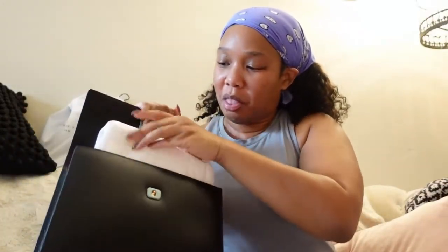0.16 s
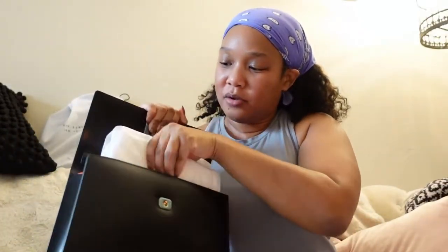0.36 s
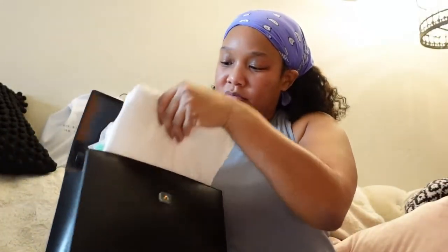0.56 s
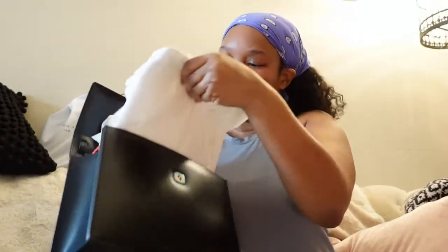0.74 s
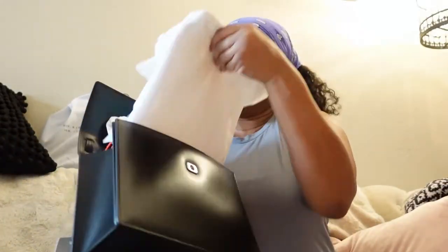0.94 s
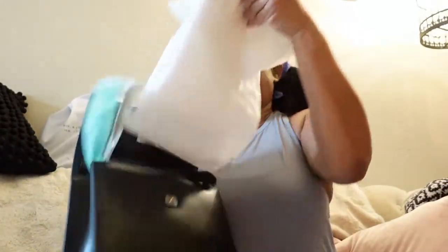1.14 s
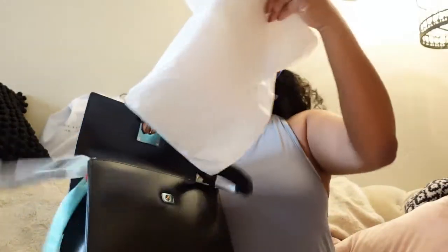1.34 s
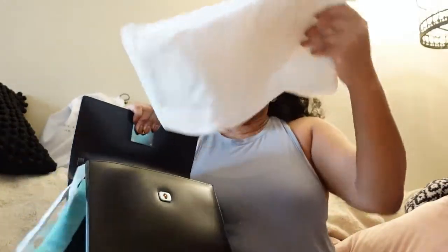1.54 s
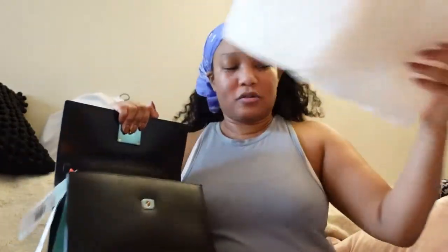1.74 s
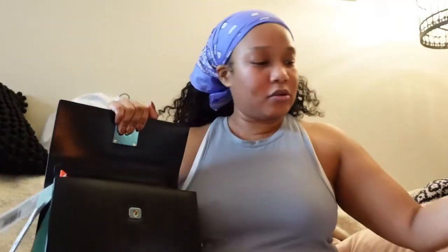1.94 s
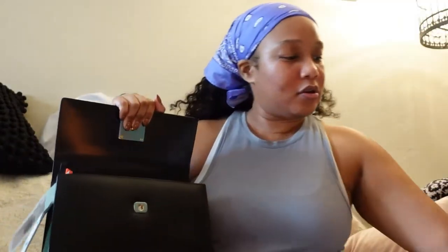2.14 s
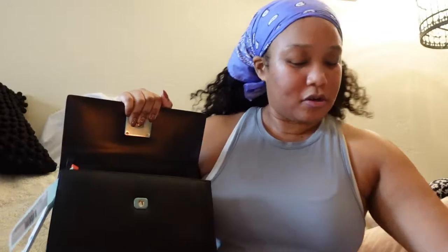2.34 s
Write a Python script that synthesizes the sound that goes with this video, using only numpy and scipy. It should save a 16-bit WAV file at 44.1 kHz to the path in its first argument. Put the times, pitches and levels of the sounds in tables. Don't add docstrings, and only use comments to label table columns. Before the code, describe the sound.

Crisp paper crackling, pulled from a stiff leather bag with dull knocks, then set down softly

```python
import sys
import numpy as np
from scipy import signal
from scipy.fft import rfft, irfft
from scipy.io import wavfile
from scipy.ndimage import uniform_filter1d

SR = 44100
rng = np.random.default_rng(int(sys.argv[2]) if len(sys.argv) > 2 else 0)


def generate_wav(signal):
    frames = np.transpose(np.atleast_2d(signal))
    scaled = np.clip(frames, -1, 1) * 32767
    pcm = np.round(scaled).astype(np.int16)
    wavfile.write(sys.argv[1], SR, pcm)


def makeup_ratio(level_db):
    decades = np.asarray(level_db, float) / 20
    return 10 ** decades


N = 105840


def level(x):
    return x / np.sqrt(np.mean(x ** 2))


def shape(x, hz, db):
    f = np.maximum(np.arange(N // 2 + 1) * SR / N, 1)
    return irfft(rfft(x) * makeup_ratio(np.interp(np.log(f), np.log(hz), db)), N)


def band(x, hz, width_hz):
    return signal.lfilter(*signal.iirpeak(min(hz, .45 * SR), hz / width_hz, fs=SR), x)


def walk(rate_hz):
    hold = int(SR / rate_hz)
    steps = np.repeat(rng.standard_normal(N // hold + 1), hold)
    return level(uniform_filter1d(steps, hold)[:N])


def fall(t, t60_s):
    return (t >= 0) * np.exp(-np.log(1000) * np.maximum(t, 0) / t60_s)


def pan(db):
    return makeup_ratio(np.array([db / 2, -db / 2]))


def air():
    noise = rng.standard_normal((2, N))
    return makeup_ratio(-70) * level(shape(noise, [30, 300, 3000, 16000], [-10, 7, -11, -70]))


def room(x, t):
    t60_s, gain_db, soft_hz = 0.39, -11.5, 7240
    lag = t[:SR // 2]
    tail = rng.standard_normal((2, len(lag))) * fall(lag - .004, t60_s)
    tail /= np.sqrt(np.sum(tail ** 2, axis=1, keepdims=True))
    same, apart = signal.fftconvolve(x.mean(axis=0)[None], tail, axes=1)[:, :N]
    apart = shape(apart, [300, 3000, soft_hz, 14000], [-14.0, -6.5, -2, 2.0])
    sides = same + apart * np.array([[1], [-1]])
    return makeup_ratio(gain_db) * shape(sides, [100, soft_hz, 16000], [0, 0, -6])


# start_s, effort_db, bag_contact_db, crispness_db
GRIP = [(0.0, -31.5, -7, -2), (0.066, -35.5, -11, 0.5), (0.125, -38.5, -16, -3), (0.14, -43.5, -13, 0),
        (0.172, -48.5, -4.5, 3.5), (0.2, -36, -20, -7), (0.247, -36.5, -15.5, 3), (0.286, -44.5, -19, 1),
        (0.34, -35, -16, -1.5), (0.385, -38.5, -10.5, -1.5), (0.415, -41.5, -7.5, -2),
        (0.445, -37.5, -13.5, -3.5)]
# start_s, effort_db, bag_contact_db, crispness_db
TUGS = [
    (.43, -37, -6, 0),
    (0.519, -31, -13.5, -1.5),
    (.56, -25.5, -10, -0.5),
    (.62, -25.5, -11, -1),
    (.69, -30.5, -9, -1),
    (.73, -26.5, -13, 1),
    (.77, -24.5, -12, 0.5),
    (.82, -33.5, -11.5, 2),
    (0.877, -34, -8, 0),
]
# start_s, effort_db, bag_contact_db, crispness_db
YANK = [(0.954, -25.5, -12.5, 2.5), (.99, -26.5, -10.5, 1), (1.07, -26.5, -15.5, -1),
        (1.122, -25, -9, -0.5), (1.145, -22.5, -15, 3.5), (1.167, -21, -11, -2), (1.197, -29.5, -20, 2),
        (1.27, -35.5, -5, 1), (1.299, -35, -8, 3.5), (1.33, -38.5, -4.5, 2.5), (1.42, -41, -3, 3.5)]


def pull():
    return np.array(GRIP + TUGS[1:] + YANK).T


def settle(t):
    gain_db, wall_hz, t60_s, hold_s = -39.5, 211.3, 0.068, .05
    decay = np.where(t < hold_s, 1, fall(t - hold_s, t60_s / 2))
    return makeup_ratio(gain_db) * np.sin(2 * np.pi * wall_hz * t) * decay * np.clip(t / 0.033, 0, 1)


# mode_hz, level_db, t60_s
BAG_MODES = [(223, -11.5, 0.091), (279.4, -6, 0.092), (317, -1, 0.096), (374.7, 0, 0.1), (430.3, -5, 0.12)]


def rubbing(t):
    rub_db, thud_db = -0.1, -33.5
    start_s, effort_db, contact_db, _ = pull()
    rub = rng.standard_normal(N) * makeup_ratio(2.2 * walk(45))
    body = np.zeros(N)
    for hz, db, t60_s in BAG_MODES:
        body += makeup_ratio(db) * level(band(band(rub, hz, 3.5 / t60_s), hz, 5.5 / t60_s))
    thud = level(shape(rub, [25, 90, 160, 220], [-12, -7.5, 3.0, -20.0]))
    press_db = np.interp(t, start_s, effort_db + contact_db) + rub_db
    leave = np.clip((1.72 - t) / 0.5, 0, 1)
    return (level(body) + makeup_ratio(thud_db / 2) * thud) * makeup_ratio(press_db) * leave


# start_s, peak_db, ring_hz, brightness_db
KNOCKS = [(1.205, -27.5, 399, -34), (1.229, -29, 425, -3.5), (1.252, -35, 405, -12), (1.288, -32, 350, -27),
          (1.347, -30.5, 402, -10), (1.408, -31, 393, -24), (1.421, -29, 380, -24), (1.442, -41, 432, -26),
          (1.486, -29, 430, -2), (1.506, -30.5, 424, -17), (1.529, -36.5, 412, -23),
          (1.558, -36.5, 410, -20), (1.686, -32, 395, -13), (1.705, -38, 361, -24), (1.729, -49, 393, -14),
          (1.756, -50, 416, -19)]


def knocks(t):
    gain_db, ring_t60_s, tick_t60_s, tick_hz = 0.45, 0.069, 0.026, 1060
    out = np.zeros(N)
    for start_s, db, hz, bright_db in KNOCKS:
        since = t - start_s
        swell = 1 - fall(since, 0.015)
        ring = np.sin(2 * np.pi * hz * since) + .5 * np.sin(2 * np.pi * 1.09 * hz * since)
        ring = ring * fall(since, ring_t60_s)
        tick = level(band(band(rng.standard_normal(N), tick_hz, 600.0), tick_hz, 1300.0))
        tick = tick * fall(since, tick_t60_s)
        out += makeup_ratio(db + gain_db) * swell * (ring + makeup_ratio(bright_db + 11.0) * tick)
    return out


def bag(t):
    return rubbing(t) + settle(t) + knocks(t)


# start_s, peak_db, pitch_hz, t60_s
PINGS = [
    (1.432, -27, 1900, .035),
    (1.447, -36, 2700, .02),
    (1.454, -36, 3300, .02),
    (1.6665, -36, 1400, .01),
    (1.754, -34, 3400, .01),
    (2.0465, -36, 4160, .015),
    (2.1415, -38, 3010, .02),
]


def pings(t):
    out = np.zeros(N)
    for start_s, db, hz, t60_s in PINGS:
        since = t - start_s
        envelope = (1 - fall(since, 0.0013)) * fall(since, t60_s)
        out += makeup_ratio(db) * np.sin(2 * np.pi * hz * since) * envelope
    return out


# start_s, mids_db, lows_db, highs_db (lows and highs relative to mids)
CRACKS = [(0.042, -37, 2, -11), (0.1063, -37, -5, -10), (0.1291, -43, 2, -10), (0.2413, -40, -5, 1),
          (0.3529, -46, 5, 3), (0.4532, -38, -8, -2), (0.5459, -33, 4, -1), (0.656, -36, 3, 2),
          (0.7071, -34, -4, -3), (0.7197, -34, 5, -3), (0.7266, -32, -9, 3), (0.7378, -31, -1, -6),
          (0.7619, -30, -11, -5), (0.8312, -37, 0, -11), (0.8367, -36, -2, 0), (0.9731, -36, 1, 8),
          (0.9945, -28, -3, -3), (1.0437, -30, -5, -6), (1.0927, -33, 1, -6), (1.1034, -27, 0, -6),
          (1.1463, -29, 1, 3), (1.1626, -27, -5, -8), (1.1714, -33, 6, 0), (1.2937, -37, -4, -13),
          (1.3014, -44, 7, 7), (1.3473, -37, -4, -1)]
# start_s, mids_db, lows_db, highs_db, length_s
SNAPS = [(1.4323, -37.0, -2.0, 0.0, 0.016), (1.4362, -35.0, 4.0, -2.0, 0.008),
         (1.4452, -44.0, 4.0, 1.0, 0.014), (1.4757, -43.0, -5.0, -11.0, 0.008),
         (1.4994, -44.0, -3.0, -5.0, 0.006), (1.5208, -42.0, 0.0, -8.0, 0.007),
         (1.5274, -38.0, -3.0, -5.0, 0.007), (1.5474, -46.0, -2.0, -7.0, 0.004),
         (1.5577, -41.0, -7.0, -9.0, 0.009), (1.5628, -43.0, -5.0, -2.0, 0.008),
         (1.5929, -46.0, 1.0, -3.0, 0.009), (1.6227, -46.0, -6.0, -3.0, 0.009),
         (1.6348, -43.0, -3.0, 2.0, 0.006), (1.6484, -45.0, -11.0, -3.0, 0.005),
         (1.6673, -34.0, -1.0, -1.0, 0.009), (1.6714, -38.0, -10.0, 0.0, 0.009),
         (1.676, -43.0, 0.0, 4.0, 0.009), (1.7022, -47.0, -9.0, 2.0, 0.005),
         (1.7129, -44.0, -3.0, 4.0, 0.009), (1.7257, -38.0, -10.0, -9.0, 0.009),
         (1.7448, -41.0, -7.0, 3.0, 0.007), (1.7546, -33.0, -5.0, -3.0, 0.005),
         (1.7632, -45.0, 1.0, 1.0, 0.005), (1.7877, -46.0, 2.0, 0.0, 0.009),
         (1.8411, -45.0, -5.0, -2.0, 0.005), (1.8478, -40.0, -15.0, -2.0, 0.009),
         (1.8518, -50.0, -10.0, 7.0, 0.009), (1.8788, -43.0, -4.0, -4.0, 0.007),
         (1.9023, -33.0, -8.0, -7.0, 0.007), (1.9543, -37.0, -10.0, -4.0, 0.006),
         (1.9944, -47.0, -15.0, 2.0, 0.005), (2.0472, -37.0, -15.0, -9.0, 0.006),
         (2.0576, -45.0, -2.0, -4.0, 0.008), (2.0832, -38.0, -14.0, -2.0, 0.005),
         (2.0915, -48.0, -9.0, 1.0, 0.009), (2.1028, -55.0, 0.0, 8.0, 0.005),
         (2.1433, -47.0, 0.0, -7.0, 0.008), (2.1744, -49.0, 1.0, -6.0, 0.009),
         (2.1828, -49.0, -8.0, -5.0, 0.006), (2.2985, -52, -1, -5, 0.009)]


def cracks(t):
    bag_length_s, rise_t60_s, tail_t60_s, tail_db, gain_db = .005, .0005, 0.05, -24, 1.5
    out, lag = np.zeros(N + SR), t[:SR // 8]
    mids_lows_highs_hz = (3500, 8000), (1300, 3500), (8000, 12200)
    filters = [signal.butter(2, hz, "band", fs=SR, output="sos") for hz in mids_lows_highs_hz]
    folds = [(*row, bag_length_s) for row in CRACKS] + list(SNAPS)
    for start_s, db, lows_db, highs_db, length_s in folds:
        decay = fall(lag, length_s) + makeup_ratio(tail_db) * fall(lag, tail_t60_s)
        burst = rng.standard_normal(len(lag)) * (1 - fall(lag, rise_t60_s)) * decay
        for sos, colour_db in zip(filters, (0, lows_db, highs_db)):
            part = signal.sosfilt(sos, burst)
            part /= part[:SR // 250].std()
            out[int(start_s * SR):][:len(lag)] += part * makeup_ratio(db + colour_db + gain_db)
    return out[:N]


def ticks(t):
    ticks_per_s, scatter_db, top_db, t60_s = 300, 3, 9, 0.002
    chance = rng.random((2, N))
    size_db = np.minimum(-scatter_db * np.log(chance[1] + 1e-9), top_db)
    hits = (chance[0] < ticks_per_s / SR) * makeup_ratio(size_db)
    clicks = signal.fftconvolve(hits, fall(t[:SR // 100], t60_s))[:N] * rng.standard_normal(N)
    return level(shape(clicks, [600, 2500, 9000, 16000], [-17, 1.5, 7, -36.0]))


# band_hz, density_db (per Hz)
PAPER = [(290, -8), (500, -14), (847, 1), (1000, -9.5), (1500, 4.5), (1800, -6), (3000, -1), (9120, -7.5),
         (15000, -12)]


def crinkle(t, free):
    grains_per_s, scatter_db, top_db, grain_cycles = 6000, 8, 10, 2.2
    spread_db, wide_hz, tick_db = 2, 12000, -8
    bag_clump_db, loose_clump_db = .9, 1.6
    paper_hz, paper_db = np.array(PAPER).T
    out = np.zeros((2, N))
    clump_db = bag_clump_db + (loose_clump_db - bag_clump_db) * free
    clump_db = clump_db * (walk(300) + .5 * walk(100)).clip(-3, 2)
    hiss_gain = makeup_ratio(-1 - 6 * free)
    for hz in 420 * 2 ** np.arange(0, 5.5, .33):
        chance = rng.random((3, N))
        size_db = np.minimum(-scatter_db * np.log(chance[1] + 1e-9), top_db)
        hits = chance[0] < grains_per_s / 5 / SR * min(hz / 3000, 1)
        snaps = hits * makeup_ratio(size_db) * np.sign(chance[2] - .5)
        snaps = snaps * pan(spread_db * min(hz / wide_hz, 1) * rng.standard_normal(N))
        width_hz = hz / grain_cycles
        grains = level(band(band(snaps, hz, width_hz), hz, width_hz))
        hiss = level(band(band(rng.standard_normal(N), hz, width_hz), hz, width_hz))
        mix = (grains + hiss_gain * hiss) / np.sqrt(1 + hiss_gain ** 2)
        band_db = np.interp(np.log(hz), np.log(paper_hz), paper_db) + 10 * np.log10(hz)
        out += makeup_ratio(band_db + 1.45 * walk(39.57)) * mix
    return level(level(out * makeup_ratio(clump_db)) + makeup_ratio(tick_db) * ticks(t))


# start_s, effort_db, left_minus_right_db
CARRY = [
    (1.42, -43, 1.0),
    (1.499, -40.5, 2.5),
    (1.6, -46, 1),
    (1.682, -39, 0),
    (1.886, -43.5, -4),
    (1.965, -39, -3),
    (2.02, -49.5, -4.5),
    (2.14, -51, -6.5),
]
# start_s, effort_db, left_minus_right_db
DROP = [
    (2.168, -45, -6),
    (2.21, -53, -5),
    (2.26, -64.5, -6),
    (2.294, -56, -9),
    (2.3, -48.5, -7),
    (2.33, -40.5, -6.5),
    (2.36, -42, -6.5),
    (2.4, -48.5, -4),
]


def paper(t):
    in_bag_pan_db, thin_hz, thin_db = .4, 1490, -4.5
    pull_s, pull_db, _, crisp_db = pull()
    carry_s, carry_db, side_db = np.array(CARRY + DROP).T
    free = np.clip((t - 1.3) / 0.32, 0, 1)
    sound = crinkle(t, free * (t < DROP[2][0]))
    thin = shape(sound, [thin_hz / 3, thin_hz * 2], [thin_db * 2, 0])
    crisp = makeup_ratio(np.interp(t, pull_s, crisp_db)) - 1
    top = shape(sound, [3000, 9000], [-20, 0]) * crisp * (1 - free)
    effort_db = np.interp(t, np.r_[pull_s, carry_s[1:]], np.r_[pull_db, carry_db[1:]])
    rustle = ((1 - free) * sound + free * thin + top) * makeup_ratio(effort_db)
    place_db = np.interp(t, carry_s, np.r_[in_bag_pan_db, side_db[1:]])
    return (rustle + cracks(t) + pings(t)) * pan(place_db)


def scene():
    t = np.arange(N) / SR
    near = paper(t) + bag(t)
    return near + room(near, t) + air()


def band_limit(x):
    return signal.sosfilt(signal.butter(12, 16750, fs=SR, output="sos"), x)


def record(dry):
    top_hz, low_hz = 15600, 75
    cut = signal.sosfilt(signal.ellip(10, .2, 50, top_hz, fs=SR, output="sos"), dry)
    cut = signal.sosfilt(signal.butter(2, low_hz, "high", fs=SR, output="sos"), cut)
    return band_limit(cut)


dry = scene()
out = record(dry)
generate_wav(out)
```